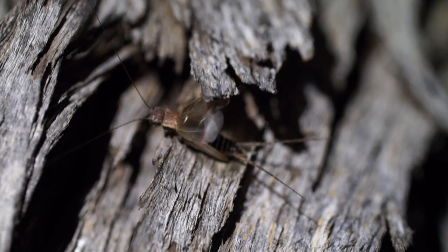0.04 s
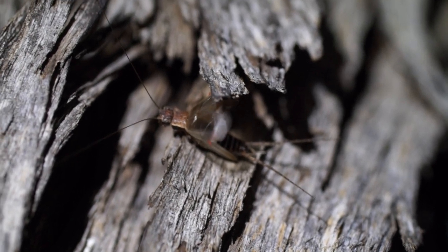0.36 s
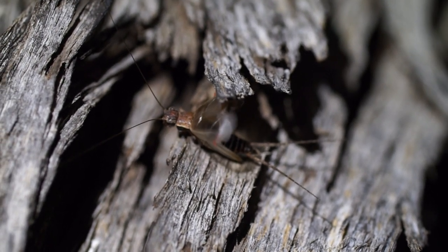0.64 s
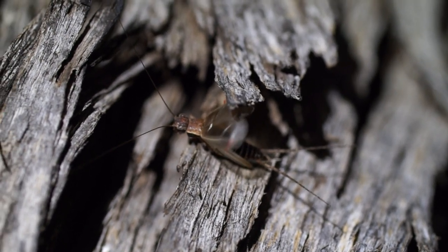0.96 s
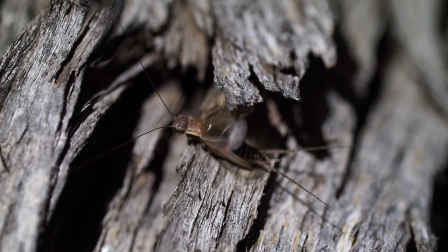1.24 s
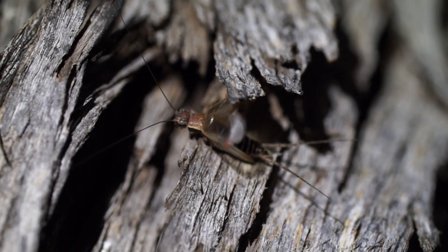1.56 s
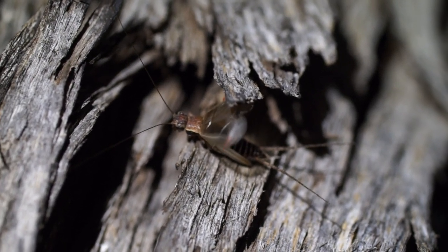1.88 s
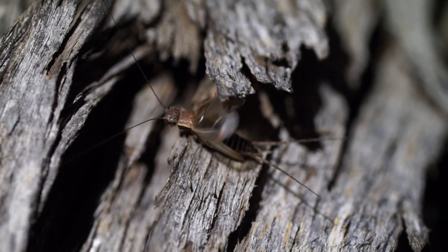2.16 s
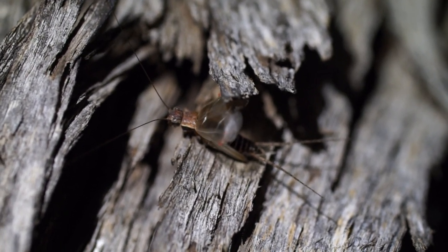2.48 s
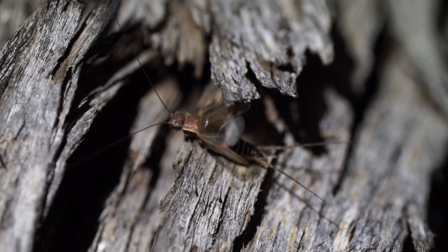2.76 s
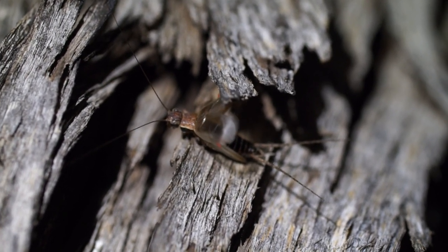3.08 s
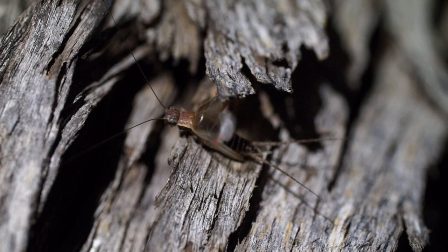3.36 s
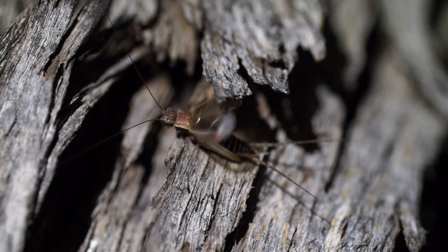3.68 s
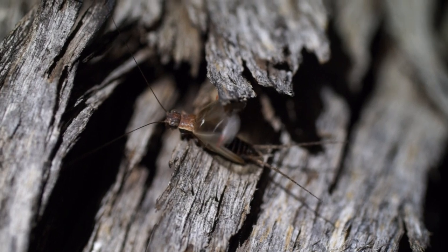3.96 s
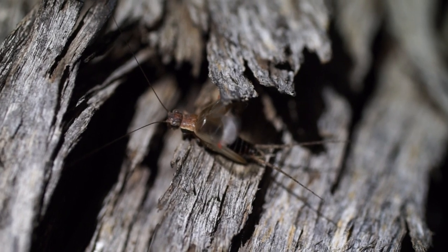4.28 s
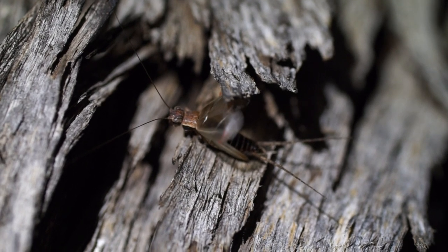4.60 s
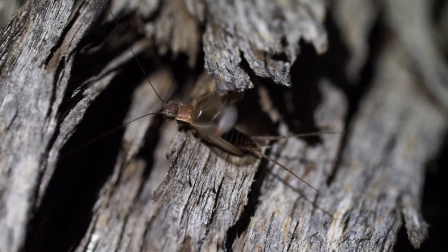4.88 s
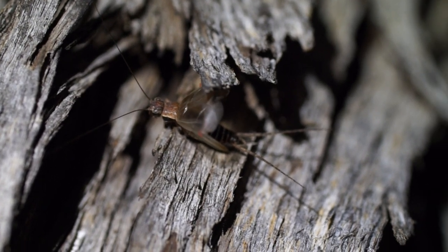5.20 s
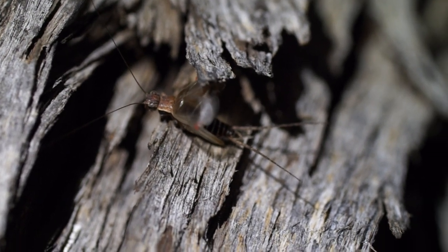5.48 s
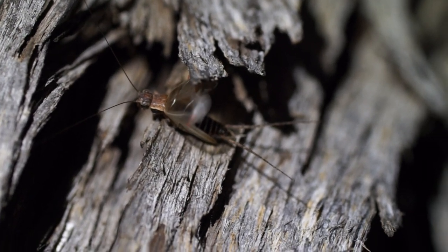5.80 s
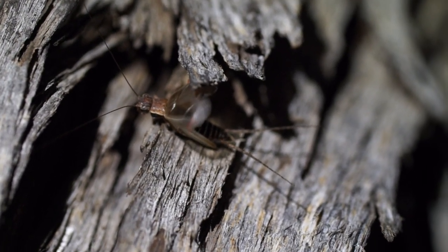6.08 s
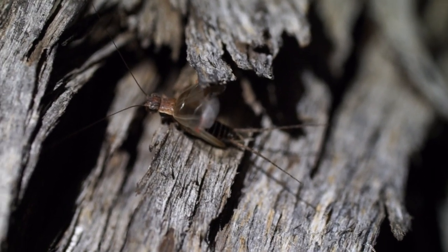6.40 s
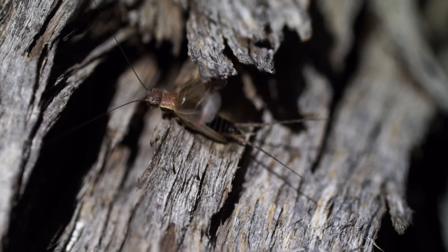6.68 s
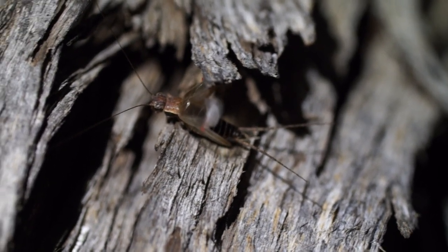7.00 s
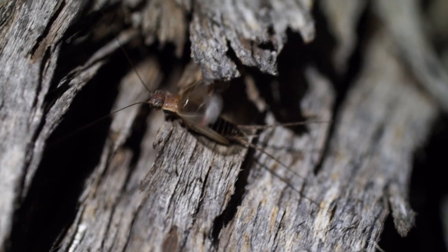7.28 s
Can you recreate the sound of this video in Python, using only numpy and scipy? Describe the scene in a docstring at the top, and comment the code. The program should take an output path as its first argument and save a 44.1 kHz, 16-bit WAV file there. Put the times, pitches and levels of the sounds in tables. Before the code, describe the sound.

Continuous high-pitched pulsing trill of a nearby cricket over faint night air, another trilling in the distance, and slight microphone handling.

```python
"""Night outdoors, over faint air: a cricket trills on dry bark right in front of a camera, 32 strokes a
second. Each closing stroke draws the file over the scraper in a falling whistle; each opening one squeaks
faintly. Further off a second cricket, higher and a little faster, trills along and comes up around 2 s.
A finger ticks on the camera near 2.3 s and 4.2 s. Near the end it slides over the body in a short scrape
that makes the camera's limiter duck."""
import sys
import numpy as np
from scipy import signal
from scipy.fft import rfft, irfft
from scipy.io import wavfile
from scipy.ndimage import uniform_filter1d

SR = 44100
rng = np.random.default_rng(int(sys.argv[2]) if len(sys.argv) > 2 else 0)


def master_out(mix):
    """Clip the mix to full scale and print it as 16-bit PCM to the path in sys.argv[1]."""
    frames = np.transpose(np.atleast_2d(mix))
    ceiling = np.clip(frames, -1, 1)
    pcm = np.round(ceiling * 32767).astype(np.int16)
    wavfile.write(sys.argv[1], SR, pcm)


N = 328545
TIME = np.arange(N) / SR


def near_cricket():
    """The lead: file and scraper whistle, rasp and squeak, with reflections from bark and trees."""
    # pace of the wings: (time [s], rate [strokes/s])
    tempo = [(0.0, 32.88), (0.3, 32.34), (1.6, 32.41), (3.3, 32.16), (3.8, 32.47), (5.7, 32.5),
             (6.6, 32.29), (7.4, 32.58)]
    age = strokes(tempo, first_s=.0097)
    swing = envelope(age, start=.00044, attack=.0058, hold=.0044, release=.0085)  # the wings close
    touch = envelope(age, start=.00048, attack=.0023, hold=.001, release=.0012)  # scraper meets file
    bite = envelope(age, start=.006, attack=.0023, hold=.0067, release=.0026)  # it digs in late
    overtones = undb(-35.5) * swing + undb(-37) * touch + undb(-26) * bite
    hz = tooth_rate(age, start_hz=5382.8, sag_hz_per_s=36830)
    song = undb(-9) * closing_whistle(age, hz, swing, overtones, spread_rad=.22,
                                      second_db=-2, third_db=-13, wander=.0053, flutter=.0067)
    scratch = file_rasp(swing) + opening_squeak(age)
    mono = song.mean(0)
    # the upper scratch spreads more widely than the whistle, so more of it comes back
    reverb_send = mono + undb(20) * ring(scratch, 9200, 2000)
    return song + scratch + bark(mono) + undb(-27) * trees(reverb_send, t60=.2)


def strokes(tempo, first_s):
    """Seconds since the wings last began to close, at every sample; the beat is slightly uneven."""
    rate = curve(tempo, TIME)
    beats = np.cumsum(rate) / SR - first_s * rate[0]
    return (beats + .0055 * walk(32)) % 1 / rate


def tooth_rate(age, start_hz, sag_hz_per_s, steady_s=.0028):
    """Pitch of the file: it holds briefly, then sags as the wings slow."""
    return start_hz - sag_hz_per_s * np.maximum(age - steady_s, 0)


def closing_whistle(age, hz, swing, overtones, spread_rad, second_db, third_db, wander, flutter):
    """File teeth drive the wing at its resonance: a whistle with two overtones."""
    swing = uniform_filter1d(swing, size=40)
    # the wing rests between strokes, so each one starts at a new phase
    restart = (swing < 1e-6) * rng.standard_normal(N)
    # the teeth catch less evenly as the stroke runs out
    uneven = .21 + (age / .0154) ** 2
    hz = hz * (1 + .00165 * walk(60) + wander * uneven * walk(1100))
    phase = np.cumsum(2 * np.pi * hz / SR + restart)
    force = undb(.29 * walk(32)) * (1 + flutter * uneven * walk(720))
    fundamental = pan(-2.07) * np.sin(phase + np.array([[spread_rad], [0]]))
    second = undb(second_db) * pan(2.3) * np.sin(2 * phase)
    third = undb(third_db) * pan(-.8) * np.sin(3 * phase)
    return force * (swing * fundamental + overtones * (second + third))


def file_rasp(swing):
    """Dry friction noise of the file: strong while the wings close, faint while they open."""
    noise = rng.standard_normal(N) * np.sqrt(swing + .1) * undb(3.2 * walk(70) + 1.3 * walk(14))
    skirt = ring(ring(noise, 5990, 600), 5990, 600)
    treble = ring(ring(noise, 8200, 2000), 8200, 2000)
    # the finest hiss comes only while the teeth are pressed on the scraper
    sizzle = undb(-6.5) * np.sqrt(swing) * ring(ring(noise, 14000, 3600), 14400, 3700)
    return undb(-50) * unit(skirt) + undb(-57) * unit(treble + sizzle)


def opening_squeak(age):
    """A faint, scratchy squeak, arching in pitch as the scraper skims back between the whistles."""
    top_hz, top_s, drop_hz, half_arch_s = 9570, .0223, 877, .0039
    arch_hz = top_hz - drop_hz * ((age - top_s) / half_arch_s) ** 2
    hz = arch_hz * (1 + .02 * walk(60) + .031 * walk(2500))
    phase = 2 * np.pi * np.cumsum(hz) / SR
    skim = envelope(age, start=.019, attack=.0015, hold=.0049, release=.003)
    return undb(-49.5 + 3.4 * walk(230)) * skim * np.sin(phase)


def far_cricket():
    """The same file-and-scraper song, higher and wetter, growing brighter as it grows louder."""
    # fader ride of the song: (time [s], level [dB])
    fader = [(0, -40), (1.9, -36.5), (2.15, -33.5), (7.45, -32.5)]
    # pace of the wings: (time [s], rate [strokes/s])
    tempo = [(0.0, 34.15), (1.7, 34.66), (2.5, 33.94), (3.9, 34.2), (7.4, 34.47)]
    level_db = curve(fader, TIME)
    bright_db = -15.5 + .83 * (level_db - level_db.max())
    age = strokes(tempo, first_s=.0086)
    swing = envelope(age, start=.00099, attack=.00397, hold=.0053, release=.005)
    bite = envelope(age, start=.00045, attack=.0038, hold=.0026, release=.0026)
    # a softer second catch ends the stroke, where the pitch has stopped falling
    catch = undb(-7.5) * envelope(age, start=.0135, attack=.004, hold=.004, release=.0048)
    hz = np.maximum(tooth_rate(age, start_hz=5732, sag_hz_per_s=26000), 5454)
    song = closing_whistle(age, hz, swing + catch, undb(bright_db) * bite, spread_rad=.1,
                           second_db=-3, third_db=-20, wander=.00784, flutter=.063)
    return undb(level_db) * (pan(-7) * song + undb(-4) * trees(song.mean(0), t60=.074))


def handling():
    """Each catch of a finger sends friction into the camera body; soft catches are dull, hard ones thin."""
    # catches of the sliding finger: (time [s], level [dB], decay [s], brightness [Hz])
    catches = [(2.275, -47, 0.0019, 1800), (4.247, -29.5, 0.0059, 600), (4.25, -46, 0.0018, 5000),
               (7.3175, -29.5, 0.0044, 14000), (7.321, -25.5, 0.0044, 3020), (7.326, -23.5, 0.0058, 14000),
               (7.329, -20, 0.003, 15700), (7.334, -15.5, 0.0041, 16000), (7.3375, -16, 0.0027, 14000),
               (7.3495, -31, 0.0024, 13000), (7.4455, -32, 0.0058, 12010)]
    # resonances of the camera body: (frequency [Hz], width [Hz], left gain [dB], right gain [dB])
    modes = [(680, 360, -6, -3), (1036, 220, 2, 3), (1840, 180, -11, 5), (2240, 310, 11, 7),
             (3340, 950, -1, -2), (5180, 1300, -22, -3), (8440, 3300, 3.5, 5.5), (12500, 1000, -3, 2.5)]
    friction, t = np.zeros((2, N + SR)), TIME[:SR // 20]
    for time_s, db, decay_s, bright_hz in catches:
        lowpass = signal.butter(2, min(bright_hz, .45 * SR), fs=SR)
        highpass = signal.butter(1, bright_hz / 7, "high", fs=SR)
        noise = rng.standard_normal((2, len(t)))
        burst = signal.lfilter(*highpass, signal.lfilter(*lowpass, noise))
        start = int(time_s * SR)
        friction[:, start:start + len(t)] += undb(db) * np.exp(-t / decay_s) * burst
    friction = friction[:, :N]
    body = sum(undb([[left], [right]]) * ring(friction, hz, width) for hz, width, left, right in modes)
    # the low resonances die away roughly, and one small part rings on faintly
    tail = undb(-15) * trees(ring(body.mean(0), 1800, 1800), t60=.086)
    small_part = undb(5) * ring(friction, hz=2760, width_hz=8)
    low_cut = signal.butter(2, 480, "high", fs=SR, output="sos")
    return undb(7.5) * signal.sosfilt(low_cut, body + tail + small_part)


def bark(x):
    """Early reflections off the bark ripple the tail of each whistle."""
    # slaps off the bark: (delay [s], left gain [dB], right gain [dB])
    reflections = [(.0043, -47, -58), (.0078, -22.5, -21.5)]
    return sum(undb([[left], [right]]) * np.roll(x, int(delay * SR))
               for delay, left, right in reflections)


def trees(x, t60):
    """A diffuse stereo tail, as from trunks and ground: as loud as x, dying by 60 dB in t60 seconds."""
    t = TIME[:SR // 2]
    tail = rng.standard_normal((2, len(t))) * undb(-60 * t / t60) * (t > .008)
    wet = signal.fftconvolve(x[None], tail, axes=1)[:, :N]
    return wet * np.std(x) / np.std(wet, axis=1, keepdims=True)


def night_air():
    """The bed: faint low rumble and hiss, swelling a little."""
    # tone of the air: (frequency [Hz], relative level [dB])
    tone = [(25, -4), (115, 0), (300, -4.5), (700, -10.5), (1500, -15.5), (3700, -19.5), (7000, -10),
            (15000, -13)]
    # its stereo width: (frequency [Hz], side minus mid [dB])
    width = [(60, -9.5), (200, -1.5), (700, 6.5), (2400, 5), (6000, -2.5)]
    hz = np.arange(N // 2 + 1) * SR / N
    mid, side = rfft(rng.standard_normal((2, N))) * spectrum(tone, hz)
    low_band_rms = np.std(irfft(mid * (hz < 3700), N))
    stereo = irfft(mid + np.array([[1], [-1]]) * side * spectrum(width, hz), N)
    return undb(-62.5 + .32 * walk(4.4)) * stereo / low_band_rms


def envelope(age, start, attack, hold, release):
    """A 0-1 rise, hold and fall within one wing beat; all times in seconds."""
    return np.interp(age, np.cumsum([start, attack, hold, release]), [0, 1, 1, 0])


def undb(db):
    """Decibels to gain."""
    return 10 ** (np.asarray(db) / 20)


def curve(points, at):
    """An automation curve: straight lines between (time, value) points."""
    return np.interp(at, *np.transpose(points))


def spectrum(table, hz):
    """Gain at hz of (frequency [Hz], level [dB]) points on a log-frequency axis."""
    f, db = np.transpose(table)
    return undb(np.interp(np.log(hz + 1), np.log(f), db))


def unit(x):
    """Scale to rms 1."""
    return x / np.sqrt(np.mean(x ** 2))


def pan(db):
    """Channel gains for a left minus right level."""
    return undb(np.array([[db], [-db]]) / 2)


def ring(x, hz, width_hz):
    """A resonance with gain 1 at its centre."""
    return signal.lfilter(*signal.iirpeak(min(hz, .45 * SR), hz / width_hz, fs=SR), x)


def walk(rate):
    """Random drift with spread near 1, turning rate times a second."""
    steps = rng.standard_normal(N // 10)
    return np.interp(TIME * rate, np.arange(len(steps)), steps)


def limiter(x, ceiling_db, release_s):
    """A treble-sensitive limiter: clamps at once and lets go exponentially."""
    treble_peak = np.abs(np.diff(x, prepend=0)).max(0)
    overshoot = np.maximum(np.log(treble_peak / undb(ceiling_db) + 1e-9), 1e-9)
    release = TIME / release_s
    reduction = np.exp(np.maximum.accumulate(np.log(overshoot) + release) - release)
    return x * np.exp(-uniform_filter1d(reduction, size=32))


def scene():
    """Two crickets, the hand on the camera and the night air."""
    return near_cricket() + far_cricket() + handling() + night_air()


def record(dry):
    """The camera limits the loudest peaks and cuts the top."""
    limited = limiter(dry, ceiling_db=-7, release_s=.038)
    high_cut = signal.ellip(10, .2, 70, 15700, fs=SR, output="sos")
    return signal.sosfilt(high_cut, limited)


dry = scene()
out = record(dry)
master_out(out)
```